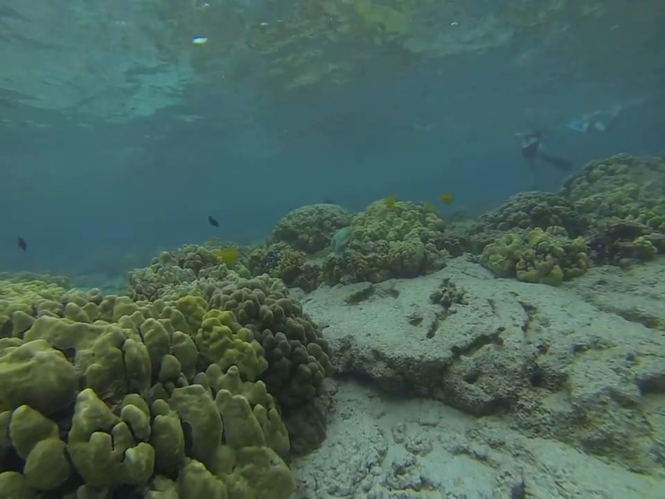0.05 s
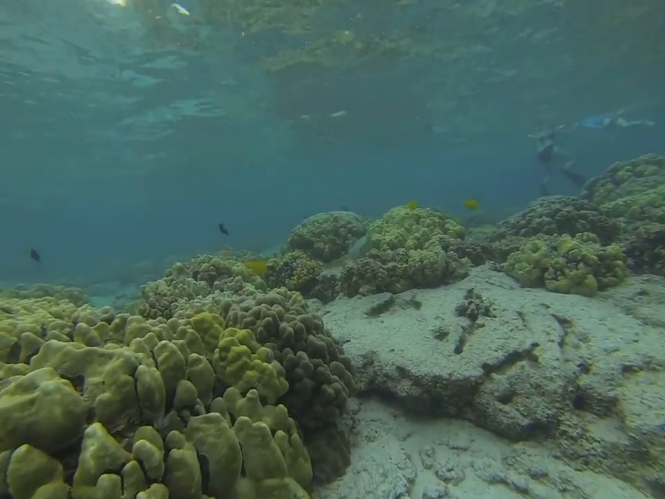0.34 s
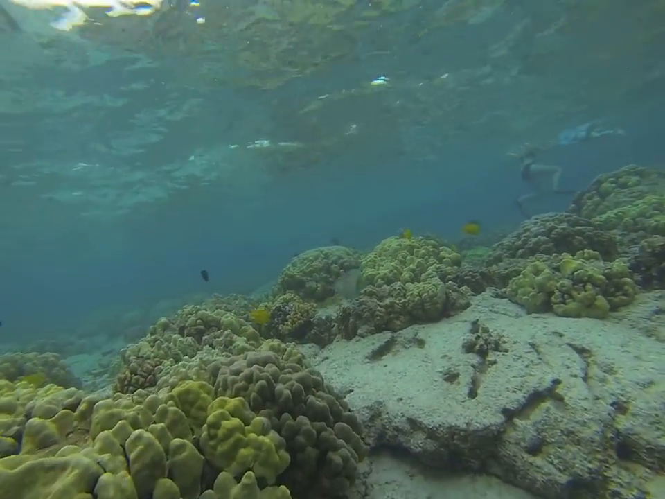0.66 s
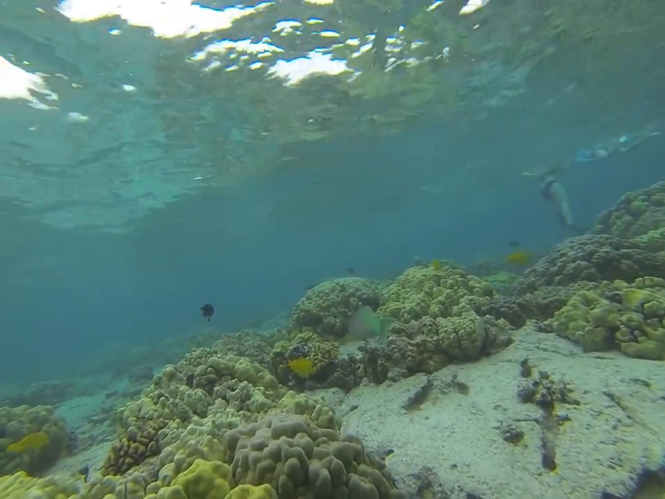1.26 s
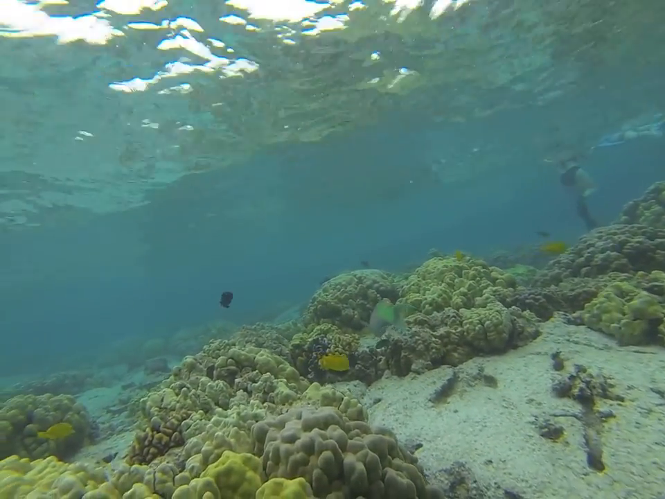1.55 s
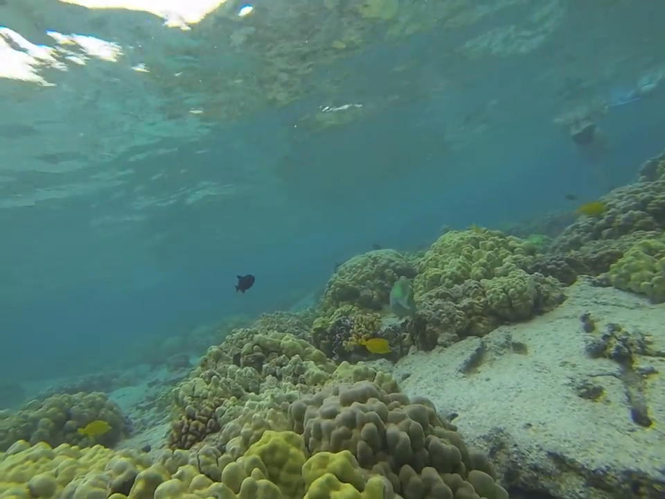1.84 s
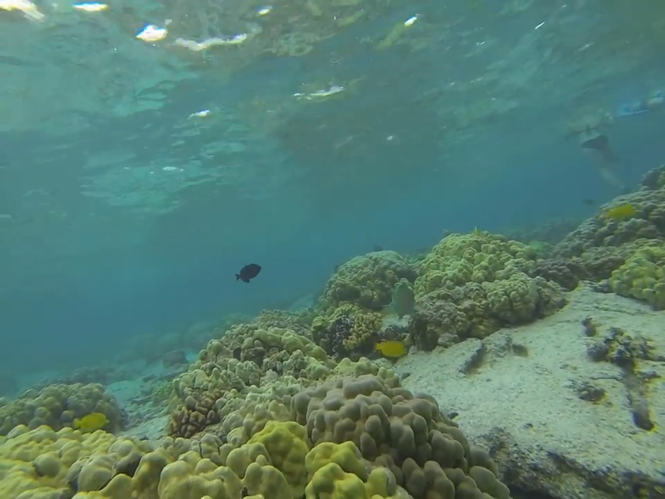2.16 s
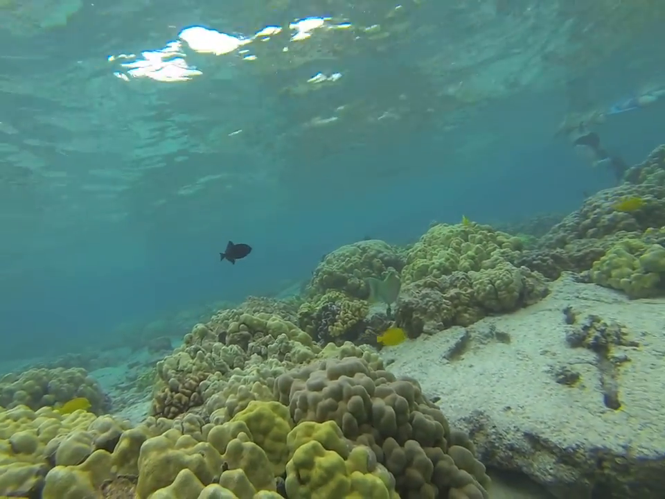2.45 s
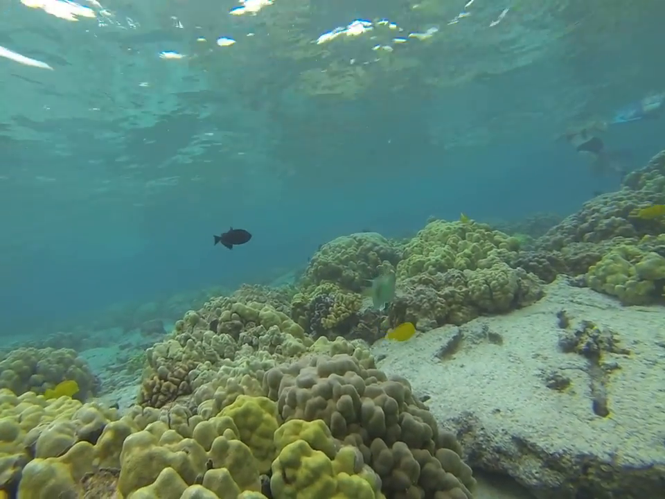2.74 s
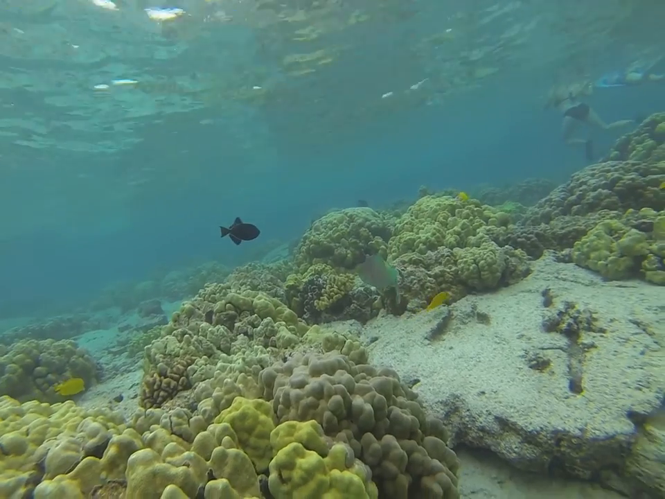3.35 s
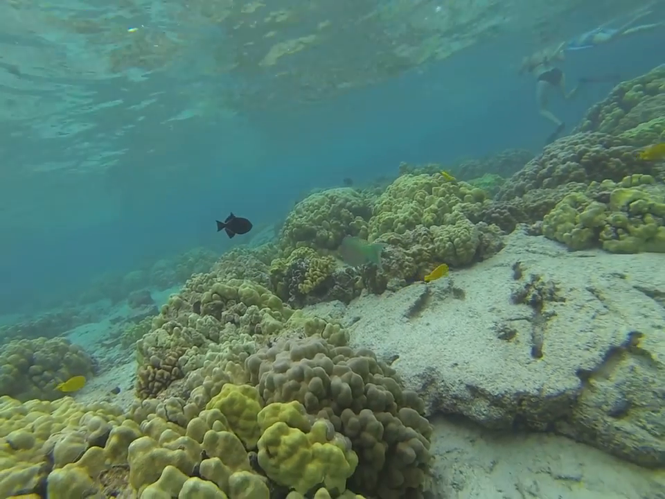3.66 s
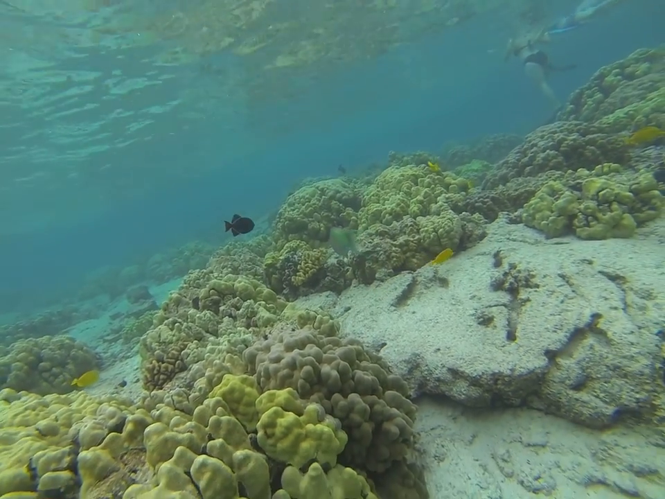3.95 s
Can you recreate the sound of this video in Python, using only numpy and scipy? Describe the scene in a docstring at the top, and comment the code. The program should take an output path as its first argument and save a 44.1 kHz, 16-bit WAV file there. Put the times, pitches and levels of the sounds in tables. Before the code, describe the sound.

Low rumble of moving water heard underwater, with scattered clicks, plops and brief gurgles.

```python
"""A low rumble of water, dotted with sharp clicks, then a cluster of loud knocks and plops.
A camera in a watertight case drifts over a shallow coral reef. Eddies press on the case, bubbles ring
against it, water gurgles over it now and then and ripples simmer overhead. Snapping shrimp click nearby
and merge into a crackle and a hiss farther off, under a faint pulsed whine from the electronics."""
import sys
import numpy as np
from scipy import signal
from scipy.fft import rfft, irfft
from scipy.io import wavfile
from scipy.ndimage import uniform_filter1d

SR = 44100
rng = np.random.default_rng(int(sys.argv[2]) if len(sys.argv) > 2 else 0)


def persist_wave(psi):
    """Save psi, clipped to +-1, as 16-bit WAV."""
    counts = np.round(np.clip(psi, -1, 1) * 32767).astype(np.int16)
    wavfile.write(sys.argv[1], SR, np.atleast_2d(counts).T)


N = 176400
T = np.arange(N) / SR

# Spectral envelopes: f/Hz, relative spectral density/dB
HISS_SPECTRUM = [(100, -55.5), (170, 7.5), (238, 1.5), (430, -8), (585, 1.5), (693, -11.5), (885, -13.5),
                 (1130, -9), (1640, -3.5), (1940, -16), (2220, -3), (2580, -17.5), (2950, -10), (3900, -21),
                 (6450, -24), (6960, -28), (15000, -36)]  # the distant reef
CRACKLE_SPECTRUM = [(300, 6.5), (900, -6), (1600, 8), (2200, 9.5), (3200, 9.5), (4000, -5.5), (5800, -2),
                    (7500, -38), (15000, -58)]  # dull snaps
CRACK_SPECTRUM = [(1000, -46), (3000, 8), (4300, 9), (5800, 11.5), (7500, 3), (9700, 2), (12000, -4.5),
                  (15000, -19.5)]  # bright snaps
SIMMER_SPECTRUM = [(700, -4), (1100, 5.5), (1700, 10.5), (2000, -13.5), (3200, -6)]  # bubbles at the surface
RUMBLE_SPECTRUM = [(12, -6), (20, 5), (30, 2.5), (42, -1), (58, -4.5), (73, -2.5), (84, -11.5), (100, -15),
                   (125, -24), (160, -47), (220, -32)]  # eddies on the case
BUBBLING_SPECTRUM = [(110, -7), (180, -5), (260, 1.5), (400, 5.5), (600, 6.5), (850, -8.5), (1300, -10.5),
                     (4000, -61)]  # low part of a gurgle
FIZZ_SPECTRUM = [(600, -18), (1400, -1), (2400, 8.5), (4200, -8), (7500, -22), (9700, -18), (15000, -50)]  # high part of a gurgle
# Rough band round a snap's ring: f/f_ring, relative spectral density/dB
SNAP_BODY_SPECTRUM = [(.3, -24), (.65, 4), (1.05, 2.5), (1.9, -12), (4, -55)]
# Swells of water stirring at the surface: middle t/s, duration/s, level/dB
SURFACE_SWELLS = [(0.127, 0.54, -55.5), (0.78, 0.28, -59.5), (1.23, 0.83, -54.5), (1.645, 0.24, -55.5),
                  (2.543, 0.35, -54), (2.804, 0.36, -52), (3.716, 0.73, -52.5)]
# Strength of the rumble: t/s, relative level/dB
RUMBLE_LEVELS = [(0.0, -32), (1.01, -28), (1.04, -28.5), (1.38, -29), (1.45, -33), (1.9, -33.5),
                 (1.96, -24), (2.04, -35), (2.36, -29), (2.41, -45), (2.48, -26), (2.64, -33),
                 (2.68, -40.5), (2.8, -27.5), (3.22, -35), (4.0, -34)]
# Gurgles: start t/s, duration/s, bubbling level/dB, fizz level/dB
GURGLE_EVENTS = [(0.89, 0.065, -38.5, -62), (1.335, 0.069, -55.5, -51.5), (1.767, 0.1, -42, -47.5),
                 (1.898, 0.13, -44.5, -47), (1.94, 0.023, -47, -40)]
# Near shrimp snaps: t/s, ring peak level/dB, ring f/Hz, crack peak level/dB
NEAR_SNAPS = [(.07, -38, 2780, -46), (.117, -39, 2480, -56), (.127, -42, 3040, -34.5),
              (0.158, -39, 1820, -42), (0.2537, -25.5, 1640, -33.5), (0.2557, -26, 2400, -43),
              (.27, -39, 3000, -47), (0.3081, -36.5, 5360, -32.5), (0.312, -42, 5840, -54),
              (0.344, -43, 5800, -40), (0.3729, -32, 1700, -61), (0.4659, -69, 2900, -39.5),
              (0.477, -44, 2960, -42), (0.571, -43.5, 2120, -59), (.587, -39, 2320, -59),
              (.672, -44, 2620, -45), (0.6806, -32, 1560, -57), (.687, -31.5, 2900, -48),
              (0.693, -39, 1840, -43), (0.7253, -36, 2110, -38), (0.8675, -38, 3090, -38),
              (0.916, -45, 2840, -41), (.986, -46, 4600, -42), (1.013, -52, 3050, -43),
              (1.3135, -34.5, 1940, -49), (1.359, -31.5, 2050, -49), (1.4167, -30.5, 3140, -71),
              (1.471, -45.5, 2900, -39.5), (1.521, -37.5, 2360, -68), (1.832, -41, 2400, -52),
              (1.923, -29.5, 2830, -30.5), (1.943, -32, 2220, -42), (1.949, -34.5, 2390, -38),
              (1.967, -42, 2580, -39.5), (2.0343, -35, 2370, -58), (2.0932, -32, 2860, -44.5),
              (2.213, -46, 3550, -35.5), (2.2904, -35, 2420, -48), (2.359, -39.5, 3310, -40.5),
              (2.834, -33.5, 2730, -39.5), (2.877, -37, 2260, -38), (2.896, -44, 3240, -39),
              (2.973, -24, 2400, -33.5), (2.999, -40, 2970, -31), (3.192, -44.5, 2840, -45),
              (3.314, -39.5, 3200, -60), (3.4248, -33, 3020, -46), (3.4466, -25, 1860, -57),
              (3.592, -39.5, 2050, -35.5), (3.624, -43.5, 3030, -44), (3.653, -38.5, 3270, -62),
              (3.707, -46.5, 2840, -39.5), (3.738, -35.5, 1740, -42.5), (3.8228, -37, 3330, -42.5),
              (3.905, -43, 1940, -42.5)]
# Knocks and plops: t/s, f/Hz, peak level before roughening/dB, rise time/ms, decay time/ms
PLOP_EVENTS = [(0.2554, 587, -30.5, 0.21, 7.6), (0.3254, 1300, -9.5, 0.29, 1.55),
               (0.3264, 997, -16, 0.18, 3.4), (0.327, 575, -11, 0.86, 4.5), (0.327, 248, -25.5, 0.35, 1.3),
               (0.334, 86, -21, 3.7, 10.6), (.377, 634, -19.5, 0.46, 12), (.441, 604, -23, 1.05, 10.3),
               (.216, 241.6, -45, 23, 37), (1.352, 1257, -38, 1.6, 3.5), (1.386, 526, -40.5, 3.3, 19),
               (1.462, 357, -35.5, 0.89, 4.2), (1.752, 895, -36.5, .47, 0.67), (1.838, 185, -34, 5.1, 6),
               (1.951, 590, -30.5, 11.3, 9.7), (2.243, 440, -36.5, 1, 2.2), (2.321, 1320, -29, .33, 1.4),
               (2.325, 520, -34.5, 0.37, 5.8), (2.353, 407, -36.5, 5.8, 8.4), (2.377, 265, -49, 3.5, 40),
               (2.7239, 690, -30, 0.23, 2.7), (2.767, 212, -42, 9.3, 4), (2.778, 1710, -50.5, 8.8, 5.1),
               (2.866, 1420, -43, 1.7, 3.2), (2.951, 1660, -43, 1.1, 2.8), (3.022, 806, -35.5, 1.6, 6.3),
               (3.273, 226, -37, 5, 6.1), (3.3818, 1040, -31, .64, 3.4), (3.385, 592, -32.5, 2.3, 3.3),
               (3.389, 743, -35.5, 1.8, 5), (3.4495, 1360, -1, 0.78, 1.1), (3.448, 576, -31, .4, 5.5),
               (3.452, 82, -25, 5, 9.7), (3.6374, 740, -24.5, 0.22, 0.61), (3.643, 952, -34.5, 3.2, 7.5),
               (3.764, 930, -44.5, 3.9, 12), (3.785, 518, -50.5, 15, 25), (3.891, 593, -45.5, 5.7, 10)]

TOP_HZ = 15000
HISS_DB, CRACKLE_DB, SPARKLE_DB, RUMBLE_GAIN_DB = -58 + 4.5, -58, -72, 0.5
WHINE_HZ, WHINE_DB, WHINE_PULSES_PER_S, WHINE_DUTY, WHINE_FIRST_S = 6452, -66.5, 47.97, .36, .0161
CRACK_MS, TAIL_MS, TAIL_DB = .8, 3.0, -9
SNAPS_PER_S, SNAP_SPREAD_DB, SNAP_RANGE_DB = 130, 4, 10
BUBBLES_PER_OCTAVE_S, BUBBLE_DECAY_CYCLES, BUBBLE_RANGE_DB = 260, 4, 14
CLEAN_DB, ROUGH_PER_DB = -27, .05  # plops weaker than CLEAN_DB come as rough clusters
SLOSH_GAIN_DB, SLOSH_MS, SLOSH_DB_PER_OCTAVE, SLOSH_TREBLE_DB = -13, 9, 20, -75


def undb(db):
    """Amplitude ratio of a level in decibels."""
    return 10 ** (np.asarray(db) / 20)


def unit(x):
    """Normalisation to rms 1."""
    return x / np.sqrt(np.mean(x ** 2))


def add(out, at, x):
    """Superposition: x joins out at time at/s."""
    i = max(int(at * SR), 0)
    out[i:i + len(x)] += x[:max(N - i, 0)]


def colour(x, spectrum, edge_db=0):
    """Minimum-phase filter through (f/Hz, level/dB); falls edge_db an octave for two octaves outside."""
    hz, db = np.array(spectrum, float).T
    size = 2 * len(x)
    octave, knots = np.log2(np.maximum(np.fft.rfftfreq(size, 1 / SR), 1)), np.log2(hz)
    beyond = np.abs(octave - np.clip(octave, knots[0], knots[-1]))
    gain_db = np.interp(octave, knots, db) - edge_db * np.minimum(beyond, 2)
    cepstrum = irfft(gain_db * np.log(10) / 20)
    cepstrum[1:len(x)] *= 2  # folding onto positive time makes the filter causal
    cepstrum[len(x) + 1:] = 0
    return irfft(rfft(x, size) * np.exp(rfft(cepstrum)))[:len(x)]


def noise(spectrum):
    """Spectrally shaped Gaussian noise, rms 1."""
    return unit(colour(rng.standard_normal(N), spectrum, edge_db=30))


def flicker(per_s):
    """Random modulation: smoothed steps, rms 1."""
    hold = int(SR / per_s)
    steps = np.repeat(rng.standard_normal(N // hold + 1), hold)
    return unit(uniform_filter1d(steps, hold)[:N])


def ring(t, hz, rise_ms, decay_ms, octaves_per_s=0):
    """Damped oscillation with an optional glide; its envelope peaks at 1 near t = 0."""
    ms = t * 1000
    envelope = np.exp(-np.logaddexp(-ms / rise_ms, ms / decay_ms))
    phase = 2 * np.pi * hz * t * (1 + octaves_per_s * np.log(2) * t / 2)
    return envelope / envelope.max() * np.cos(phase)


def burst(size=1024):
    """Impulse and scattering: a sharp crack with a short tail from the coral."""
    ms = np.arange(size) / SR * 1000
    return rng.standard_normal(size) * (np.exp(-ms / CRACK_MS) + undb(TAIL_DB) * np.exp(-ms / TAIL_MS))


def snap(spectrum):
    """A broadband transient: one filtered crack, peak 1."""
    crack = colour(burst(), spectrum)
    return crack / np.abs(crack).max()


def snap_shower(spectrum):
    """Shot noise: snaps of random time and strength, rms 1."""
    out = np.zeros(N)
    for when, chance in rng.random((int(SNAPS_PER_S * N / SR), 2)):
        db = min(-SNAP_SPREAD_DB * np.log(1 - chance), SNAP_RANGE_DB)
        add(out, when * N / SR, undb(db) * burst())
    return unit(colour(out, spectrum))


def bubble_swarm(spectrum, low_hz, high_hz):
    """Constant-Q resonators: small bubbles of random pitch all decay in equally many cycles; rms 1."""
    out = np.zeros(N)
    count = int(BUBBLES_PER_OCTAVE_S * np.log2(high_hz / low_hz) * N / SR)
    for when, pitch, strength in rng.random((count, 3)):
        hz = low_hz * (high_hz / low_hz) ** pitch
        cycle_ms, t = 1000 / hz, np.arange(-2 / hz, 20 / hz, 1 / SR)
        bubble = ring(t, hz, cycle_ms / 2, BUBBLE_DECAY_CYCLES * cycle_ms)
        add(out, when * N / SR, hz * undb(BUBBLE_RANGE_DB * strength) * bubble)
    return unit(colour(out, spectrum, edge_db=30))


def electronic_whine():
    """Pulse modulation: a thin tone from the electronics is chopped on and off, its phase jittering."""
    pulse_on = (T - WHINE_FIRST_S) * WHINE_PULSES_PER_S % 1 < WHINE_DUTY
    gate = uniform_filter1d(pulse_on.astype(float), size=90)
    jitter_rad = 0.57 * flicker(WHINE_PULSES_PER_S)
    return undb(WHINE_DB) * gate * np.sin(2 * np.pi * WHINE_HZ * T + jitter_rad)


def distant_reef():
    """Incoherent summation: countless far snaps and the stir of the surface blend to a hiss."""
    return undb(HISS_DB) * noise(HISS_SPECTRUM)


def reef_crackle():
    """Random impulse trains: many weaker shrimp, some dull and some thin and bright."""
    dull = undb(CRACKLE_DB) * snap_shower(CRACKLE_SPECTRUM)
    bright = undb(SPARKLE_DB) * snap_shower(CRACK_SPECTRUM)
    return dull + bright


def surface_ripples():
    """Bubble resonance: ripples overhead simmer with small bubbles in slow swells."""
    swells = sum(undb(db) * np.cos(np.pi * np.clip((T - at) / length, -.5, .5))
                 for at, length, db in SURFACE_SWELLS)
    simmer = bubble_swarm(SIMMER_SPECTRUM, low_hz=900, high_hz=2600)
    flicker_db = 2 * flicker(per_s=25)
    return swells * simmer * undb(flicker_db)


def flow_rumble():
    """Turbulent pressure fluctuation: eddies press on the drifting case."""
    times, levels_db = np.array(RUMBLE_LEVELS).T
    return noise(RUMBLE_SPECTRUM) * undb(np.interp(T, times, levels_db) + RUMBLE_GAIN_DB)


def gurgles():
    """Water washes over the case: low bubble resonances and a spitting fizz share a half-sine envelope."""
    bubbling = bubble_swarm(BUBBLING_SPECTRUM, low_hz=140, high_hz=1800)
    hiss = noise(FIZZ_SPECTRUM)
    spit_db = 3.5 * flicker(per_s=500)
    fizz = hiss * unit(undb(spit_db))
    out = np.zeros(N)
    for at, length, bubbling_db, fizz_db in GURGLE_EVENTS:
        progress = np.clip((T - at) / length, 0, 1)
        out += np.sin(np.pi * progress) * (undb(bubbling_db) * bubbling + undb(fizz_db) * fizz)
    return out


def near_shrimp():
    """Impulse excitation: each bright crack sets off a short, rough ring of the case."""
    out, t = np.zeros(N), np.arange(-.003, .03, 1 / SR)
    for at, ring_db, hz, crack_db in NEAR_SNAPS:
        body = snap([(hz * ratio, level) for ratio, level in SNAP_BODY_SPECTRUM])
        add(out, at, undb(crack_db) * snap(CRACK_SPECTRUM) + undb(ring_db + 3) * body)
        case_ring = undb(ring_db) * ring(t, hz, rise_ms=.03, decay_ms=2.84)
        add(out, at + t[0] + .00045, case_ring)  # 0.45 ms behind the crack
    return out


def plops():
    """Damped resonance: each bubble or knock rings, rising slightly, and sloshes the water round it."""
    out, t = np.zeros(N), np.arange(-.06, .2, 1 / SR)
    for at, hz, db, rise_ms, decay_ms in PLOP_EVENTS:
        roughness = np.clip((CLEAN_DB - db) * ROUGH_PER_DB, 0, 1)
        wobble = (1 + roughness * flicker(per_s=190)[:len(t)]) / np.hypot(1, roughness)
        tone = ring(t, hz, rise_ms, decay_ms, octaves_per_s=1.05)
        add(out, at + t[0], undb(db) * tone * wobble)
        band = [(hz, 0), (2 * hz, -SLOSH_DB_PER_OCTAVE), (TOP_HZ, SLOSH_TREBLE_DB)]
        slosh = unit(colour(rng.standard_normal(len(t)), band, SLOSH_DB_PER_OCTAVE))
        envelope = ring(t, 0, rise_ms, SLOSH_MS)
        add(out, at + t[0], undb(min(db, CLEAN_DB) + SLOSH_GAIN_DB) * slosh * envelope)
    return out


def scene():
    """Linear superposition: the pressures of all sources add at one microphone."""
    water = flow_rumble() + gurgles() + surface_ripples() + plops()
    return (water + distant_reef() + near_shrimp() + electronic_whine() + reef_crackle())[None]


def record(dry):
    """Band limiting: a steep elliptic low-pass removes the treble above TOP_HZ."""
    return signal.sosfilt(signal.ellip(8, .2, 70, TOP_HZ, fs=SR, output="sos"), dry)


dry = scene()
out = record(dry)
persist_wave(out)
```